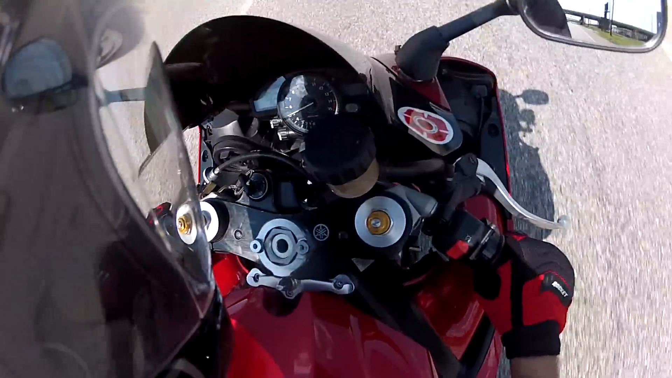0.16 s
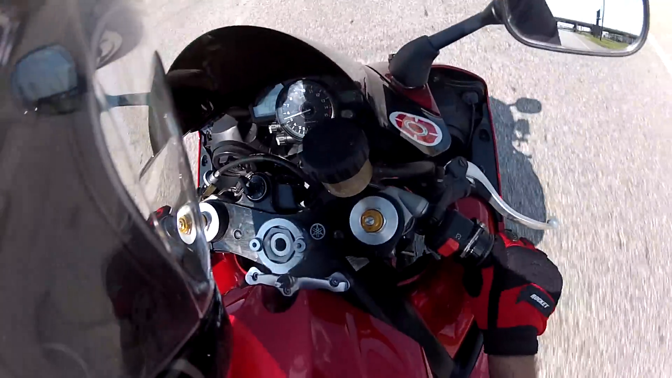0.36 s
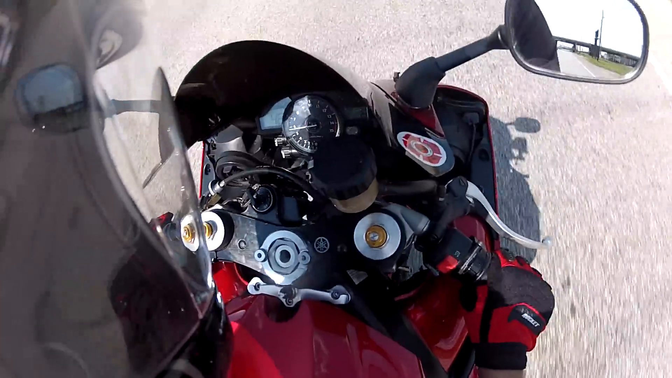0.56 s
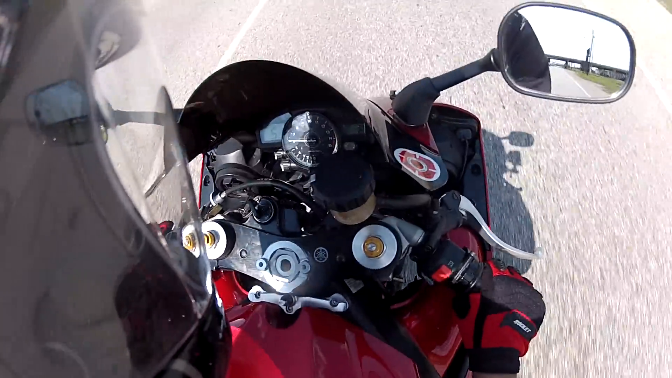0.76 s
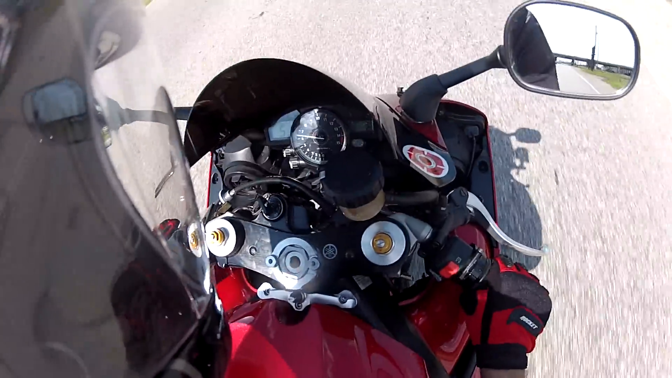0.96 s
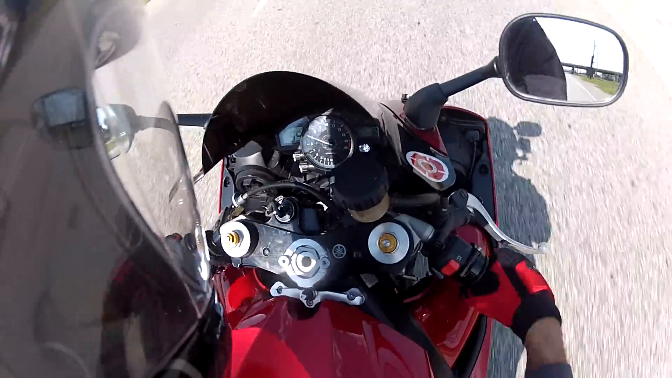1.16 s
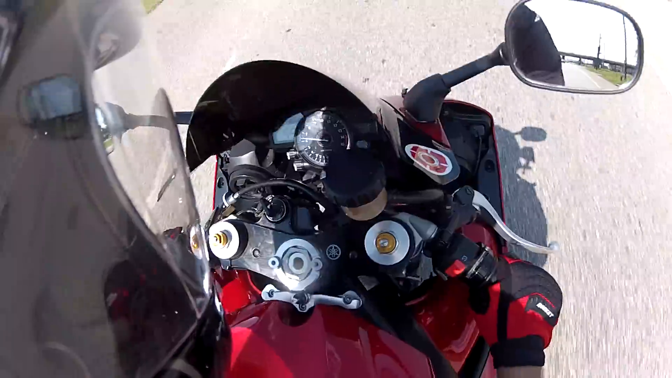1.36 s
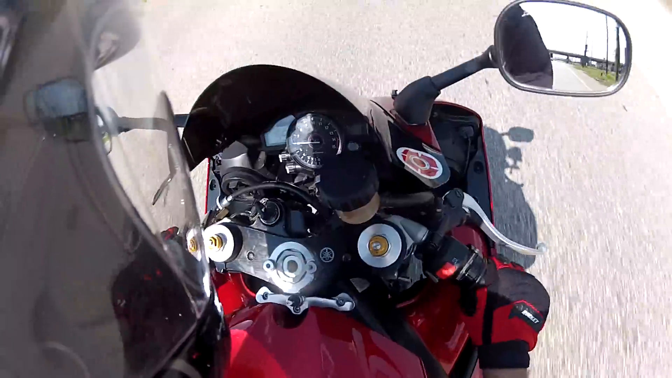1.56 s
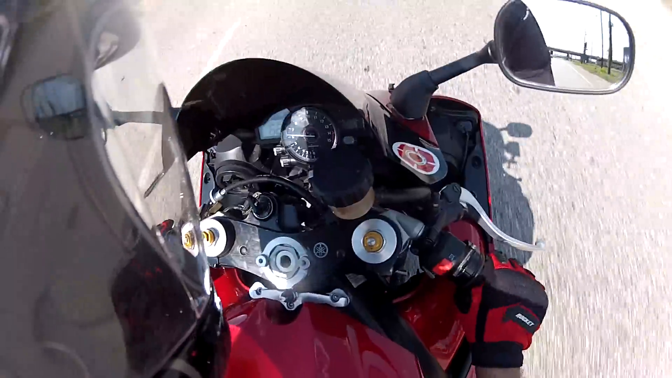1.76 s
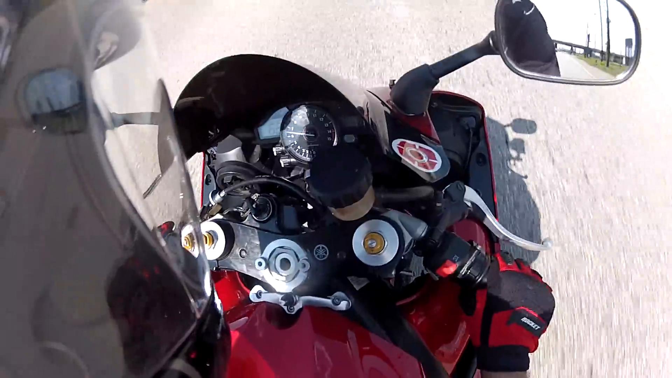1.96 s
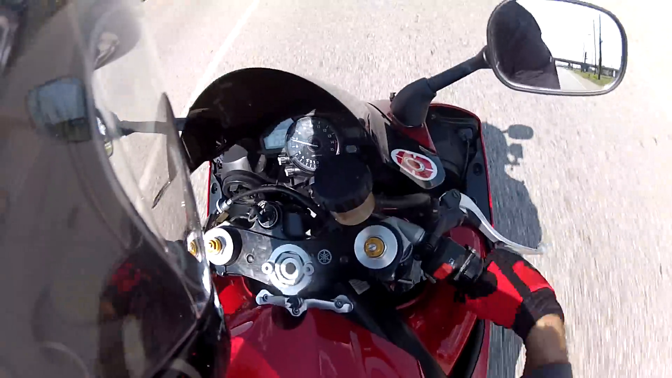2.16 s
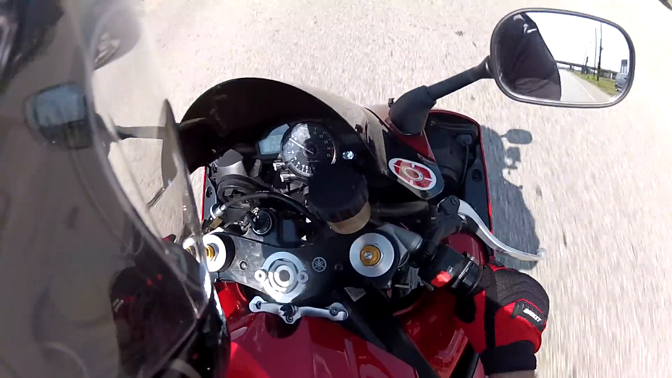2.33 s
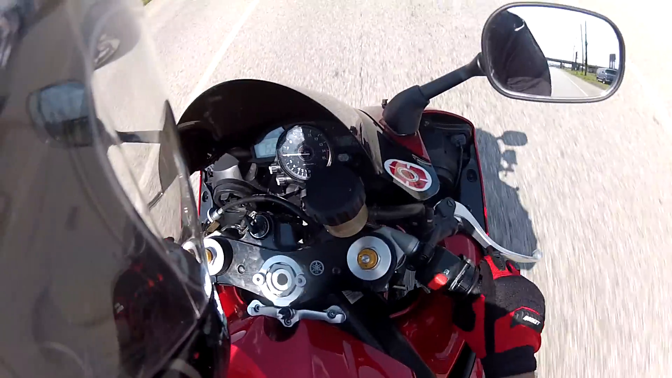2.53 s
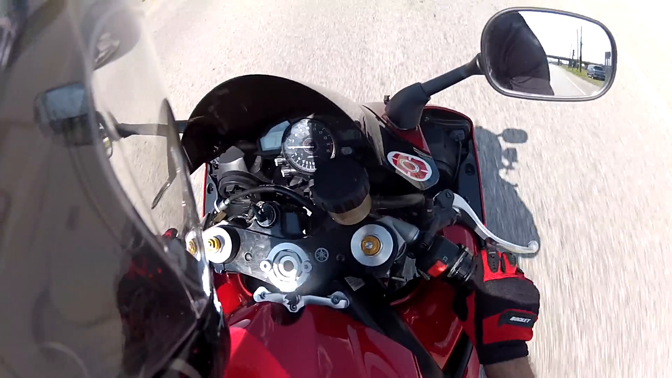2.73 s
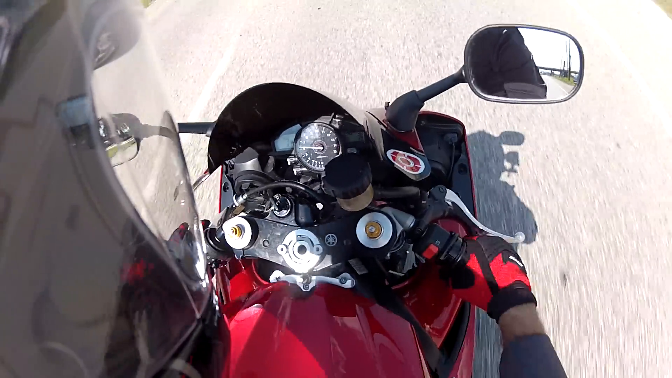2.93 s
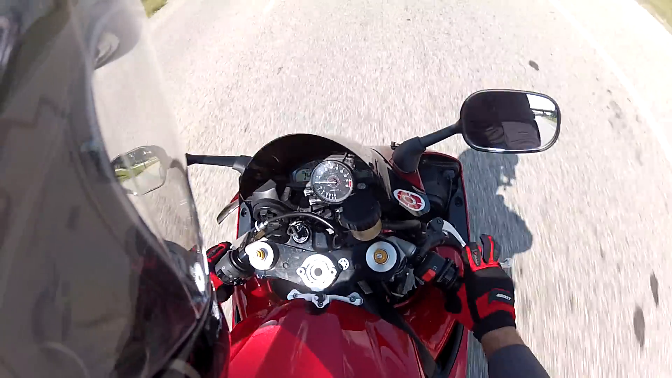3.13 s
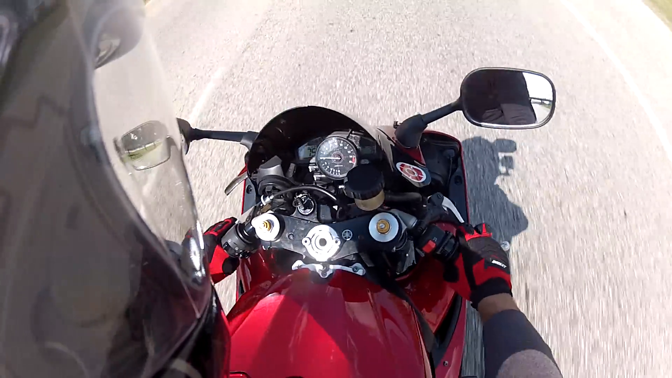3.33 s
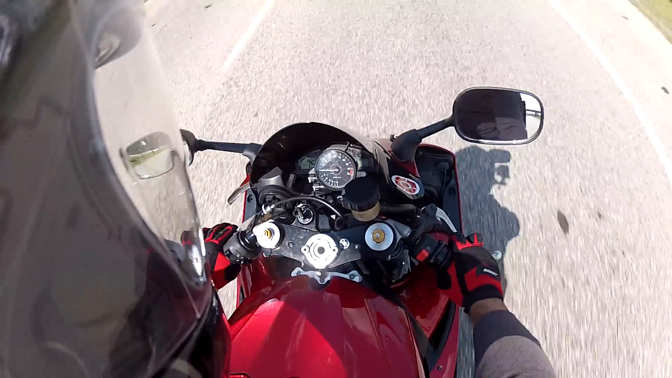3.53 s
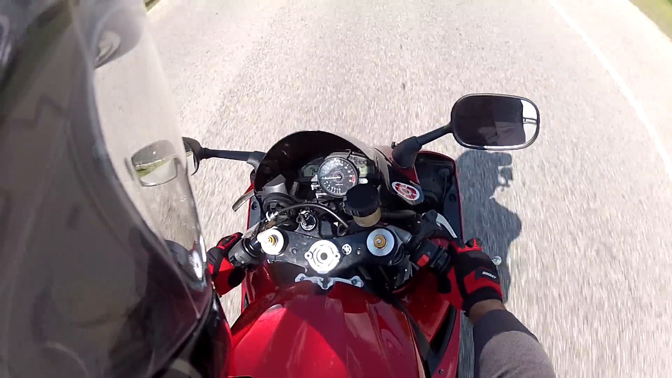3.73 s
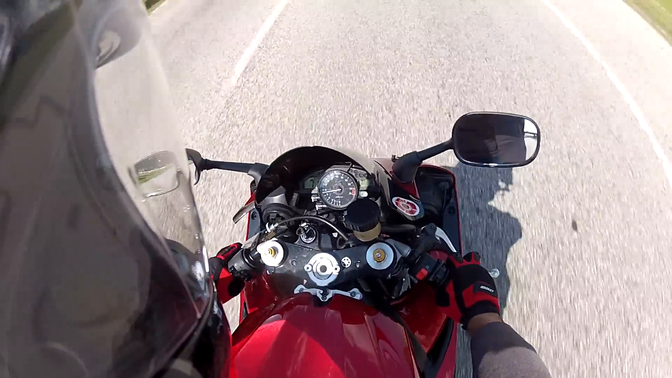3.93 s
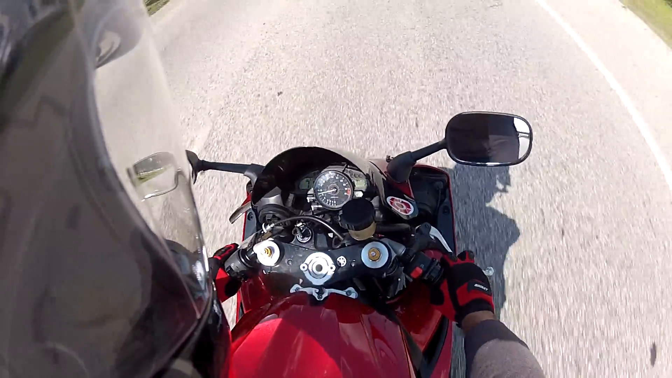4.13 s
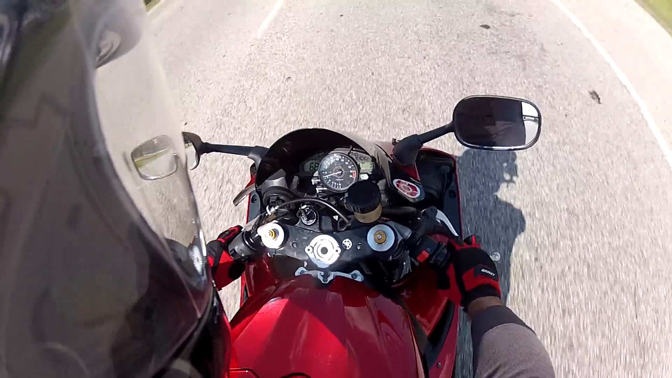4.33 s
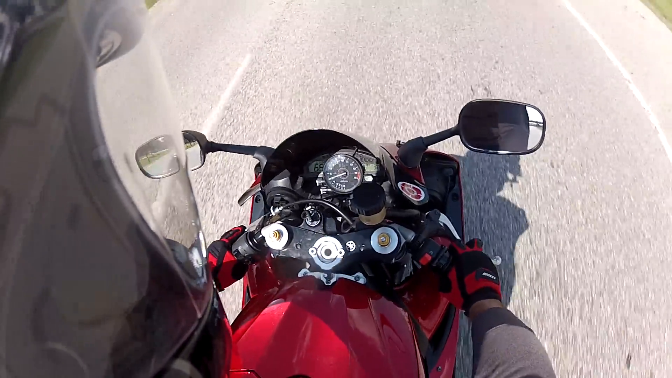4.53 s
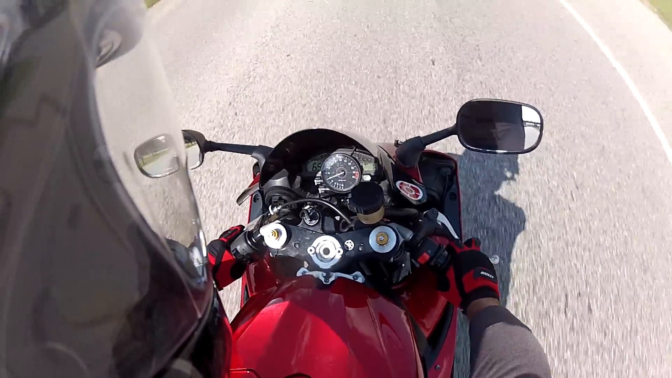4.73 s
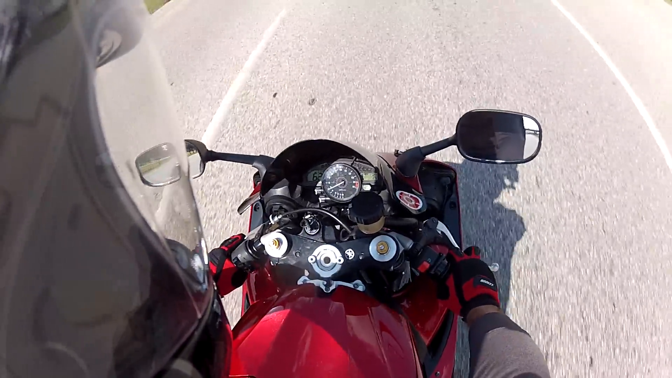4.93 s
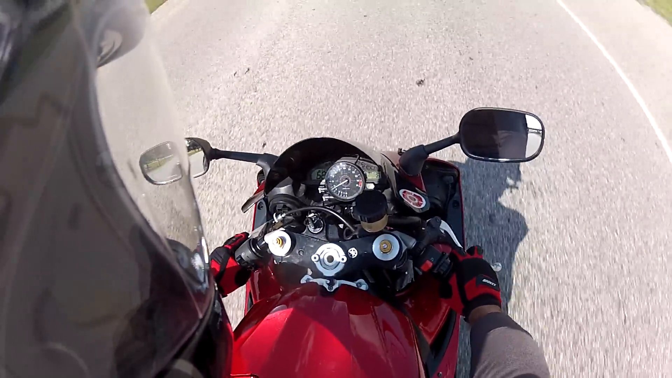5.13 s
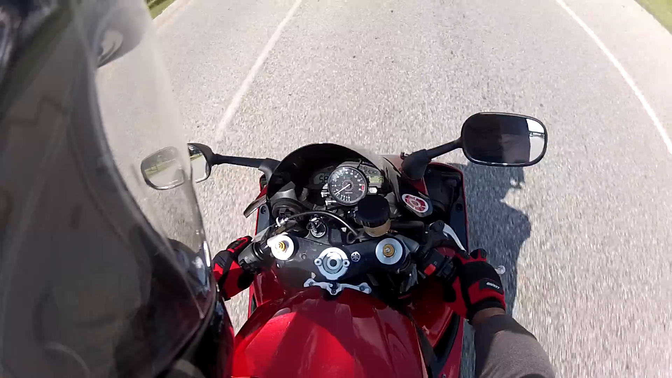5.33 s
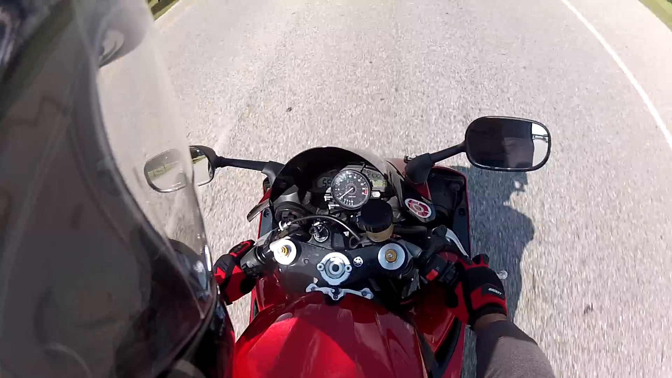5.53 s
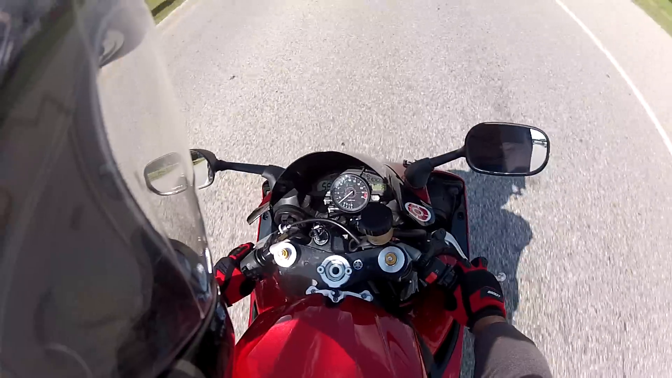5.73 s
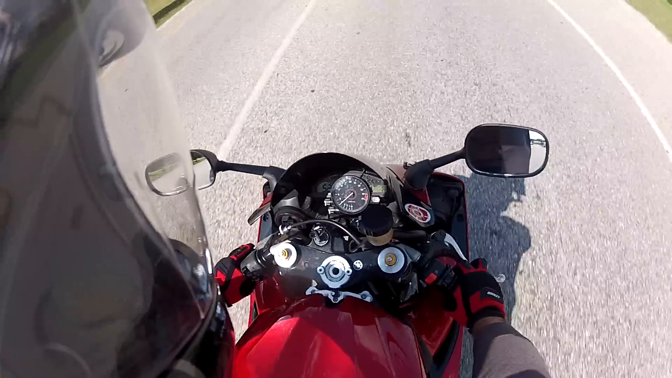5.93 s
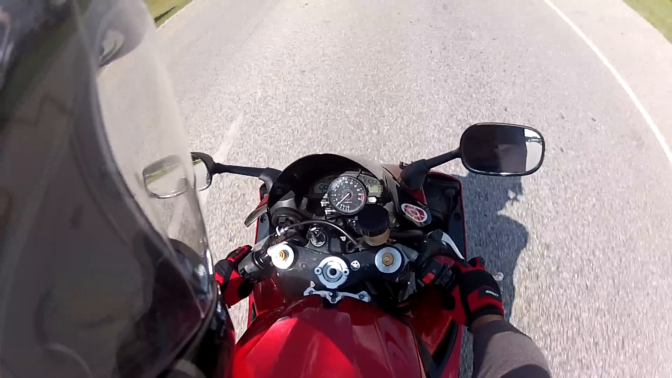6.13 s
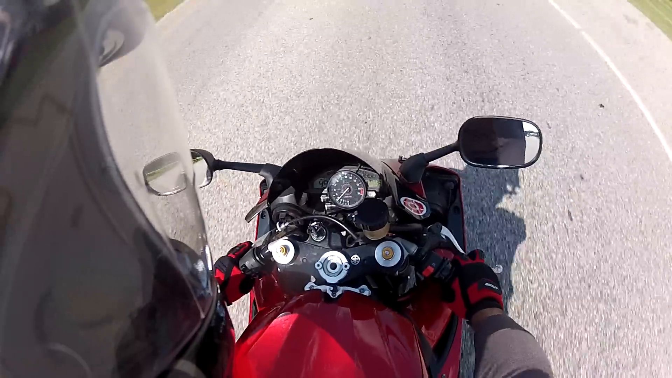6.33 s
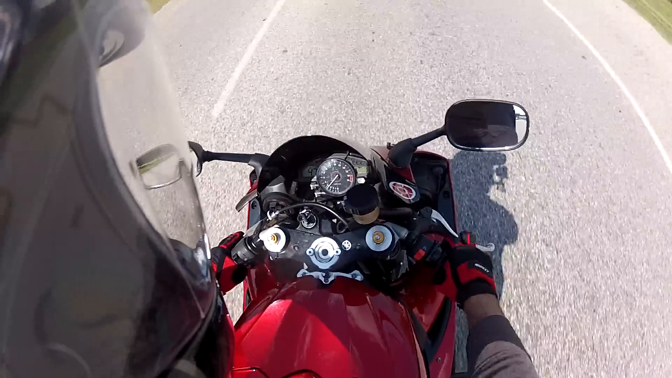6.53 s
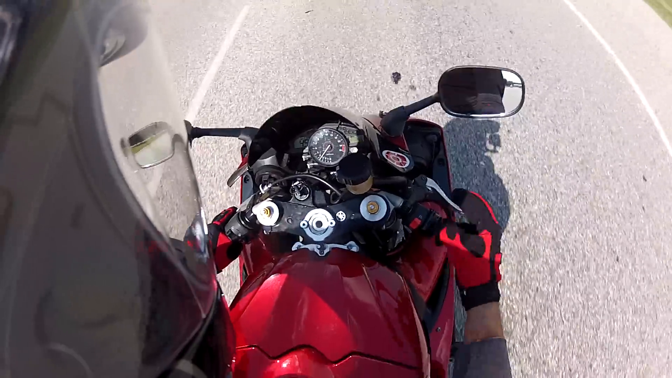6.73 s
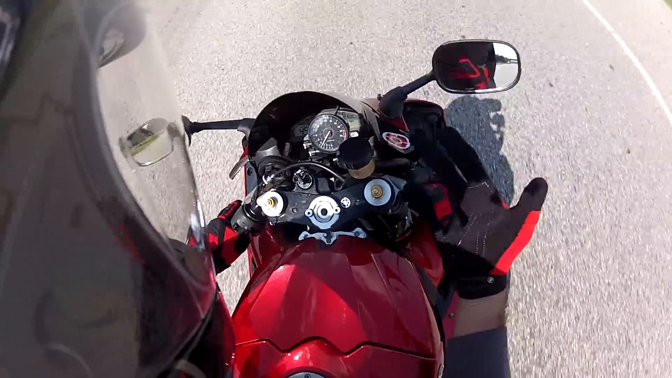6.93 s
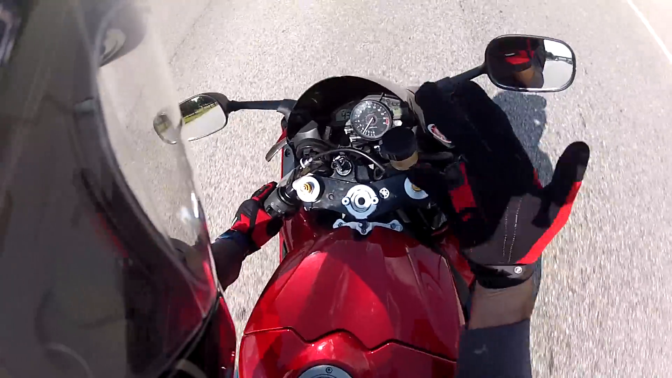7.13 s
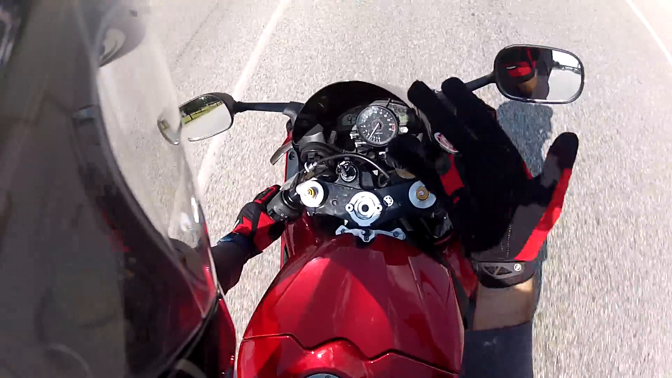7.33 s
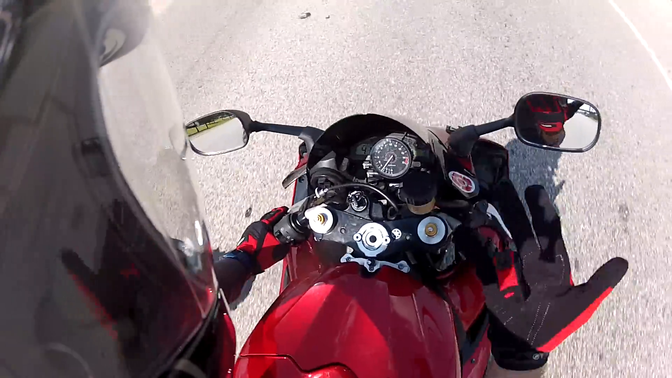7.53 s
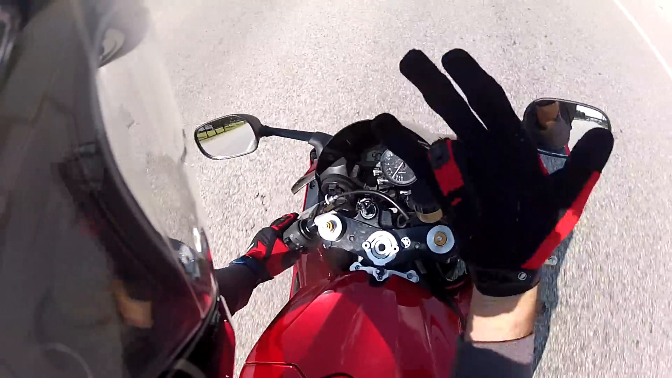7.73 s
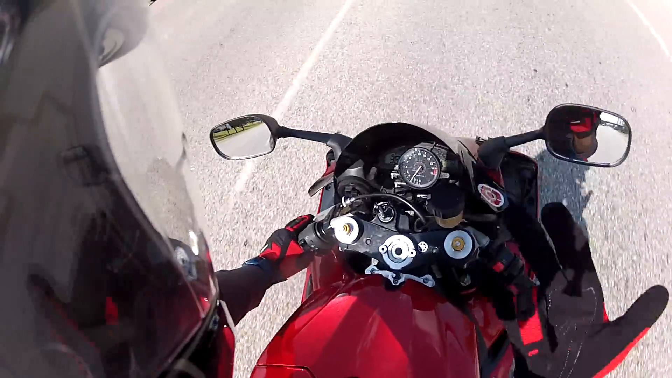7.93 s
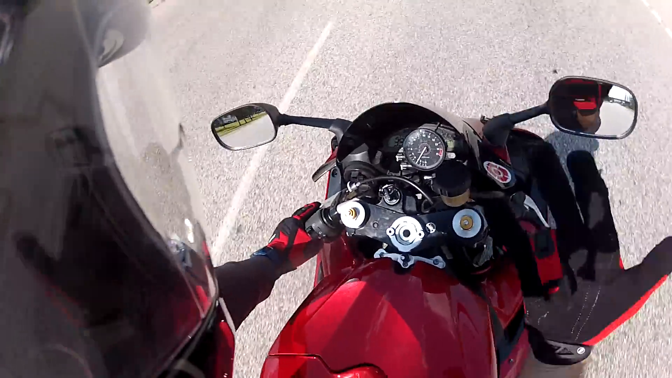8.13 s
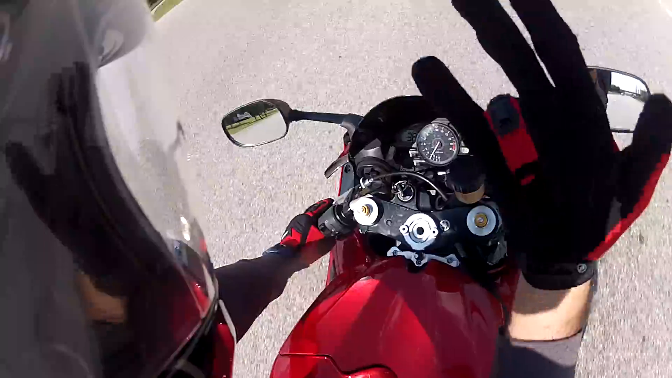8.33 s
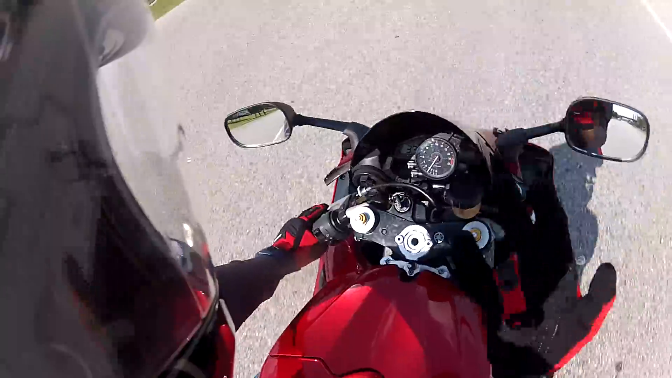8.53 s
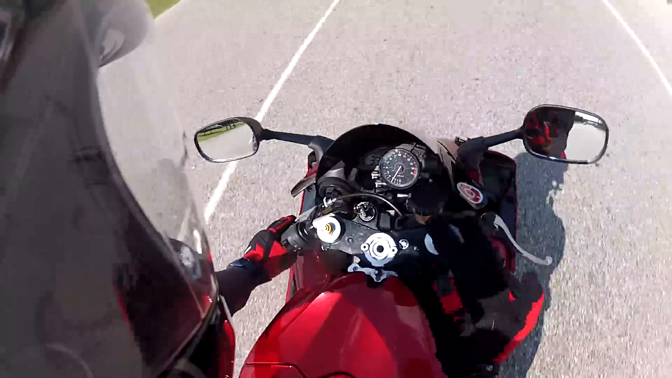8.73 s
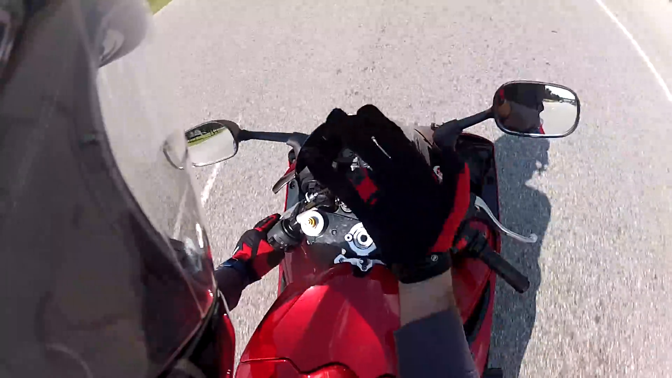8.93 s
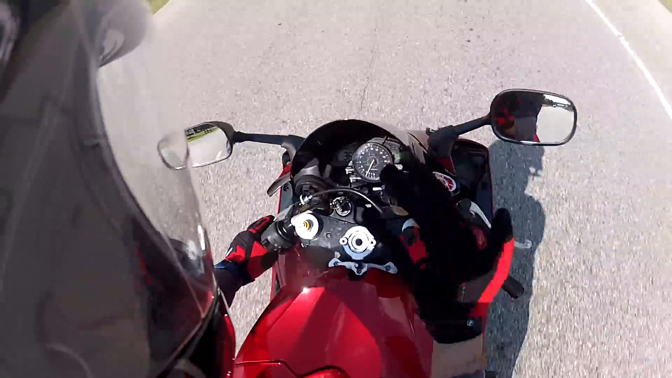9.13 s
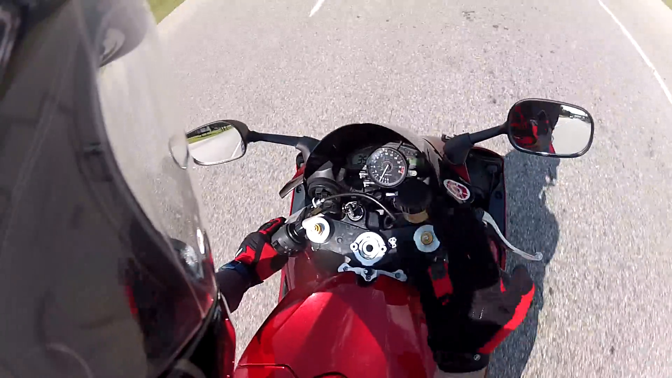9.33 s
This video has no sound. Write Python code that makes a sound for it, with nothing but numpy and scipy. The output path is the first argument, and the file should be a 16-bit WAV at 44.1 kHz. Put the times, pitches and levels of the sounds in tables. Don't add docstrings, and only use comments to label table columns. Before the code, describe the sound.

From 0 s a four-cylinder sports motorcycle accelerates hard, a buzzing, raspy tone rising in pitch with metallic whine and growing wind hiss. At about 1.1 s a sharp exhaust crack marks an upshift; revs flare briefly, then drop back near 1.3 s and pull again. A second flare and crack come around 2.2-2.3 s, followed by a lighter, shorter pull. The throttle shuts near 3 s, with another crack at 3.2 s. From 3.3 to 5.4 s the engine coasts down through irregular soft, hollow exhaust thuds and burbling, while gusts thump the helmet and visor. From 5.5 s wind recedes and pitch keeps sinking. Faint fairing knocks tick around 6.6-7.1 s. By 8-9.5 s only a quiet low drone and thin air remain, with a brief gust near 8.6 s. The small helmet camera sounds close, dry and grainy, level dipping momentarily after each crack.

```python
import sys
import numpy as np
from scipy import signal
from scipy.io import wavfile
from scipy.ndimage import uniform_filter1d

SR = 44100
rng = np.random.default_rng(int(sys.argv[2]) if len(sys.argv) > 2 else 0)


def bounce(signal):
    frames = np.transpose(np.atleast_2d(signal))
    limited = np.clip(frames, -1, 1)
    pcm = np.round(limited * 32767).astype(np.int16)
    wavfile.write(sys.argv[1], SR, pcm)


def ratio_of_db(decibels):
    return 10 ** (np.asarray(decibels, float) / 20)


N = 417627

# (time [s], ring [dB], snap [dB], recorder gain drop [dB])
CRACK_EVENTS = [
    (1.1182, -4.5, -4.5, -6.5),
    (2.321, -3.5, -2, -4.5),
    (3.1734, -3.5, -7, -9.5),
]


def columns(table):
    s, *values = np.transpose(table)
    return [np.interp(np.arange(N) / SR, s, v) for v in values]


def unit(x):
    return x / np.sqrt(np.mean(x ** 2))


def ring(x, hz, width_hz):
    return signal.lfilter(*signal.iirpeak(hz, hz / width_hz, fs=SR), x)


def walk(rate):
    k = int(SR / rate)
    held = np.repeat(rng.standard_normal(N // k + 1), k)
    return unit(uniform_filter1d(uniform_filter1d(held, k), k)[:N])


def response(table, hz):
    f, db = np.transpose(table)
    return np.interp(np.log(hz), np.log(f), db)


def rider():
    # (clutch home [s], clutch pulled [s], firing at start [Hz], firing at end [Hz], load [dB])
    gears = [
        (0, 1.139, 161.2, 217.6, 0),
        (1.335, 2.18, 187.9, 219.3, -1.5),
        (2.355, 2.95, 189.2, 203.6, -5),
    ]
    # (top [s], flare [Hz], tone with throttle shut [dB])
    flares = [
        (1.203, 51, -4),
        (2.257, 68.99, -10),
    ]
    # (time [s], firing rate [Hz], load [dB])
    coast = [(2.99, 196.2, -18), (3.1, 198, -12.5), (3.3, 200.6, -10.5), (3.65, 189.5, -9.5),
             (4.0, 179.5, -20), (4.25, 174.2, -8), (4.55, 164.5, -13), (5.5, 135.5, -14.5),
             (6.0, 126.8, -14.5), (6.5, 117.6, -12), (7.0, 109.6, -14.5), (7.5, 105, -11.5),
             (8.0, 100.1, -12.5), (9.0, 93.8, -11.5), (9.47, 92.34, -16)]
    roll_off, load_slew_s = 1.74, .03
    rows = []
    for home, pull, start_hz, end_hz, db in gears:
        rows += [(home, start_hz, db), (pull, end_hz, roll_off * db)]
    hz, load_db = columns(rows + coast)
    t = np.arange(N) / SR
    free = free_db = 0
    for (top, flare_hz, db), old, new in zip(flares, gears, gears[1:]):
        hump = np.sin(np.pi / 2 * np.interp(t, [old[1], top, new[0]], [0, 1, 0]))
        hz = hz + flare_hz * hump
        free = free + hump
        free_db = free_db + db * np.minimum(2 * hump, 1)
    return hz, uniform_filter1d(load_db, int(load_slew_s * SR)), free, free_db


def throttle():
    # (time [s], width [s])
    swaps = [
        (1.204, 0.0068),
        (1.318, .008),
        (2.243, 0.012),
        (2.344, 0.012),
        (2.985, 0.0063),
    ]
    t = np.arange(N) / SR
    return np.prod([np.tanh((t - s) / width) for s, width in swaps], axis=0)


def firing_tone(turn, hz, load_db, free, free_db, lead):
    # (frequency [Hz], level [dB])
    tone_response = [(93, -21.5), (105, -19.5), (127, -26), (150, -19.5), (162, -21.5), (180, -13),
                     (220, -7), (285, -10)]
    # (frequency [Hz], level [dB])
    octave_response = [(186, -22), (200, -13.5), (222, -8), (255, -16), (280, -19.5), (330, -25.5),
                       (410, -19.5), (560, -28)]
    shut = (1 + lead) / 2
    misfire_db = 1.5 * np.clip(hz / 124.1 - 1, 0, .3) / 0.28 * walk(14)
    tone_db = response(tone_response, hz) + .9 * load_db + shut * (3 + free_db + misfire_db)
    octave_db = response(octave_response, 2 * hz) + 0.57 * load_db + shut * (-7.5 - 6 * free)
    tone = lead * ratio_of_db(tone_db + 0.53 * walk(35)) * np.sin(turn)
    return tone + ratio_of_db(octave_db + 0.57 * walk(30)) * np.sin(2 * turn + 0.82)


def uneven_cylinders(turn, hz, shut):
    # (multiple of firing rate, throttle open [dB], throttle shut [dB])
    orders = [(.25, -20, -10), (.5, -3.5, -2.5), (1.5, -3, 4), (1.75, -16.5, -27), (2.25, -28, -9),
              (2.5, -7, -4), (2.75, -0.5, -26), (3, -0.5, -14.5), (3.25, -5, -20.5), (3.5, -15, -18.5),
              (3.75, -6.5, -28), (4, -20, -24), (4.25, -12, -24), (4.75, -13.5, -34), (5, -15, -27),
              (5.75, -17.5, -39), (10.5, -13.5, -50)]
    # (frequency [Hz], width [Hz], level [dB])
    pipe_modes = [(105, 8.6, 13.5), (148, 37, -19.5), (240, 66, 6.5), (416, 66, 11), (468, 72, -12.5),
                  (532, 39, 5), (650, 50, 3.5), (778, 54, 5.5), (912, 25, 12), (1100, 80, 7),
                  (1920, 170, 15)]
    grid_hz = np.arange(6000)
    colour_db = sum(gain / (1 + (2 * (grid_hz - f) / w) ** 2) for f, w, gain in pipe_modes)
    out = 0
    for order, open_db, shut_db in orders:
        db = open_db + shut * (shut_db - open_db)
        db = db + colour_db[(order * hz).astype(int)] + 1.4 * walk(18)
        out = out + ratio_of_db(db) * np.sin(order * turn + 2 * np.pi * rng.random())
    return out


def knock_whine(turn):
    cylinder_db = [-1, -18, -3.5, -12]
    # (frequency [Hz], width [Hz], level [dB])
    whine_modes = [(1040, 170, -13), (1912, 113, 3), (2187, 270, -5.5), (2420, 180, 0.5)]
    firing = np.floor(turn / (2 * np.pi)).astype(int)
    strength_db = np.array(cylinder_db)[firing % len(cylinder_db)] + 0.59 * walk(200)
    knocks = np.diff(firing, prepend=0) * ratio_of_db(strength_db)
    return unit(sum(ratio_of_db(db) * ring(ring(knocks, f, w), f, w) for f, w, db in whine_modes))


def engine():
    hz, load_db, free, free_db = rider()
    turn = 2 * np.pi * np.cumsum(hz * (1 + 0.0017 * walk(25.02))) / SR
    lead = throttle()
    shut = (1 + lead) / 2
    uneven_db = -27 + 0.76 * load_db - 3 * shut - 0.1971 * np.maximum(hz - 199.4, 0)
    tones = firing_tone(turn, hz, load_db, free, free_db, lead)
    tones = tones + ratio_of_db(uneven_db) * uneven_cylinders(turn, hz, shut)
    return np.sqrt(2) * tones + ratio_of_db(uneven_db - 1.5 - 2.7 * shut) * knock_whine(turn)


def burst(hz, rise_s, fall_s):
    t = np.arange(int(.08 * SR)) / SR
    shape = (1 - np.exp(-t / rise_s)) * np.exp(-t / fall_s)
    return shape / shape.max() * np.sin(2 * np.pi * hz * t)


def crack(ring_db, snap_db):
    knock = burst(1100, .0004, .0022) + .6 * burst(684, .001, .004)
    noise = unit(ring(rng.standard_normal(len(knock)), 1200, 1700))
    snap = np.abs(burst(190.0, 0.00015, 0.0011)) * noise
    click = ratio_of_db(-2) * burst(2400, .00005, .0004)
    return ratio_of_db(snap_db) * (snap + click) - ratio_of_db(ring_db) * knock


def pops():
    # (time [s], peak [dB], pitch [Hz])
    thuds = [(3.265, -13, 269), (3.37, -9.5, 233), (3.667, -18, 230.6), (3.904, -15, 225.7),
             (4.075, -17, 264.3), (4.241, -11, 229), (4.29, -22, 240), (4.362, -12.5, 209.4),
             (4.473, -19, 250), (4.568, -17, 216.9), (4.753, -22, 226), (4.823, -18, 235.7),
             (4.883, -14, 209.4), (4.97, -16, 220.6), (5.05, -15, 204.8), (5.215, -14, 224.5),
             (5.4, -15, 245), (6.747, -23, 222.6)]
    # (time [s], peak [dB], pitch [Hz])
    fairing_knocks = [(0.538, -20, 1140), (6.639, -30, 1050), (6.69, -28, 673), (6.716, -31, 1030),
                      (6.852, -23, 684), (6.96, -22, 1040), (7.016, -26, 1002), (7.049, -28, 677)]
    sounds = [(s, crack(ring_db, snap_db)) for s, ring_db, snap_db, _ in CRACK_EVENTS]
    sounds += [(s, ratio_of_db(db) * burst(hz, .002, .012)) for s, db, hz in thuds]
    sounds += [(s, ratio_of_db(db) * burst(hz, .002, .009)) for s, db, hz in fairing_knocks]
    out = np.zeros(N + SR)
    for s, sound in sounds:
        start = int(s * SR)
        out[start:start + len(sound)] += sound
    return out[:N]


def airflow():
    # (time [s], hiss [dB], throat over hiss [dB], buffet [dB])
    air = [(0, -25.5, -.5, -44), (.3, -22.5, 0, -39), (1.3, -19, -1, -37), (2.3, -19.5, 0, -34.5),
           (2.45, -18.5, 1, -40), (3.1, -19, .5, -37), (3.5, -19, .3, -34.5), (4.25, -18.5, -1, -32),
           (4.95, -20, -1, -35.5), (5.9, -25.5, -2.5, -39), (6.5, -29, -2.5, -39), (7.03, -32.5, 1.5, -42),
           (7.12, -33.5, -1.5, -43), (7.6, -36, -1, -41), (8.5, -37, -1.5, -52), (9.1, -35, -1.5, -40),
           (9.47, -37.5, -1, -52)]
    # (time [s], length [s], helmet swing [dB], visor swing [dB])
    gusts = [(.64, .12, 1, 8), (.95, 0.22, 1, 4), (1.21, 0.087, 7, 8), (1.52, 0.13, 7, 5),
             (1.899, .35, -8, 6), (2.72, .12, 3, 9), (3.08, .12, 1, 6), (3.388, 0.088, 12, 5),
             (3.8, .3, 10, -4), (4.2, 0.26, 9, -9), (4.37, .14, -15, 14), (4.93, 0.073, 4, 3),
             (4.55, .12, 2, 0), (5.17, .1, 12, 0), (5.55, .2, 3, 3), (6.02, 0.11, 4, 1),
             (7.05, 0.099, -1, 10), (8.578, .1, 9, 16)]
    t = np.arange(N) / SR
    hiss_db, throat_db, buffet_db = columns(air)
    helmet_db, visor_db = buffet_db, buffet_db + 2.5
    for s, length, helmet_swing, visor_swing in gusts:
        gust = np.exp(-(2 * (t - s) / length) ** 2)
        helmet_db = helmet_db + helmet_swing * gust
        visor_db = visor_db + visor_swing * gust
    burble_db = -28 + .5 * (hiss_db - hiss_db.max()) + 2 * (t > 3.2) + 1.5 * walk(5)
    return hiss_db, throat_db, helmet_db, visor_db, burble_db


def blown(modes, flicker_db, rate):
    out = 0
    for hz, width, db in modes:
        noise = rng.standard_normal(N)
        air = ring(ring(noise, hz, 1.99 * width), hz, 1.99 * width)
        out = out + ratio_of_db(db + flicker_db * walk(rate)) * air
    return unit(out)


def shake(hz, wander):
    return np.sqrt(2) * np.sin(2 * np.pi * np.cumsum(hz * (1 + wander * walk(6))) / SR)


def wind():
    # (frequency [Hz], width [Hz], level [dB])
    throat_modes = [(404, 137, -8.5), (580, 92, -14), (684, 55, -1.5), (790, 91, -7.5), (924, 50, -3.5),
                    (1039, 43, 0), (1139, 69, -1), (1435, 195, -7)]
    housing_modes = [(1922, 200, -4.5), (2022, 290, -4), (2238, 127, -4.5), (2407, 300, -5.5),
                     (2942, 46, -7), (3094, 84, -7), (3436, 320, -9.5), (3704, 173, -8)]
    vent_modes = [(4330, 170, -1.5), (4672, 175, -0.5), (5170, 250, -6.5), (5636, 250, -7.5)]
    buffet_modes = [(45, 41, -0.5), (95, 50, 0.5)]
    burble_modes = [(170, 52, 1.5), (227.3, 47.4, 5.5), (290, 110, -8.5)]
    hiss_db, throat_db, helmet_db, visor_db, burble_db = airflow()
    gust_db = 0.12 * walk(8) + .5 * walk(70) + 0.35 * walk(400)
    vent = ratio_of_db(-11 + 0.21 * (hiss_db + 19.0)) * blown(vent_modes, 1.0, 15)
    throat = ratio_of_db(throat_db) * blown(throat_modes, 0.6, 17)
    hiss = ratio_of_db(hiss_db + gust_db) * (blown(housing_modes, 0.69, 20) + vent + throat)
    helmet = ratio_of_db(helmet_db - 1 + 2.5 * walk(7)) * shake(30, .07)
    visor = ratio_of_db(visor_db - 1 + 2.5 * walk(9)) * shake(62, .04)
    rumble = ratio_of_db((helmet_db + visor_db) / 2 + 4.0) * blown(buffet_modes, 1.4, 3.7)
    burble = ratio_of_db(burble_db) * blown(burble_modes, 0.54, 18)
    return hiss + helmet + visor + rumble + burble


def scene():
    return (engine() + pops() + wind())[None]


def duck():
    t, duck_db = np.arange(N) / SR, 0
    for s, *_, drop_db in CRACK_EVENTS:
        since = np.maximum(t - s - .004, 0)
        duck_db = duck_db + drop_db * (1 - np.exp(-since / 0.0022)) * np.exp(-since / 0.11)
    return ratio_of_db(duck_db)


def low_pass(x):
    return signal.sosfilt(signal.butter(12, 15630, fs=SR, output="sos"), x)


def record(dry):
    hold_hz, hold = 12000, 4
    slow = signal.resample_poly(dry[0] * duck(), hold_hz // 300, SR // 300)
    steps = np.repeat(np.clip(slow, -.92, .92), hold)
    held = signal.resample_poly(steps, SR // 300, hold * hold_hz // 300)[:N]
    top_cut = signal.ellip(12, .2, 50, 15300, fs=SR, output="sos")
    mix = signal.sosfilt(top_cut, held)[None]
    return low_pass(mix)


dry = scene()
out = record(dry)
bounce(out)
```